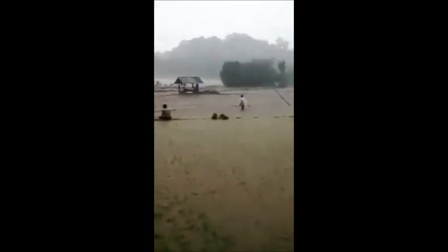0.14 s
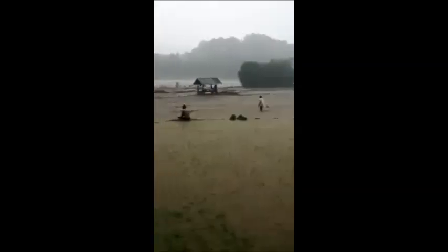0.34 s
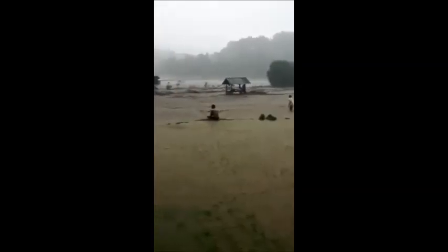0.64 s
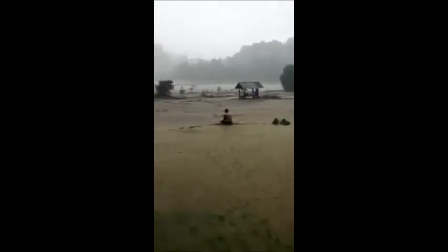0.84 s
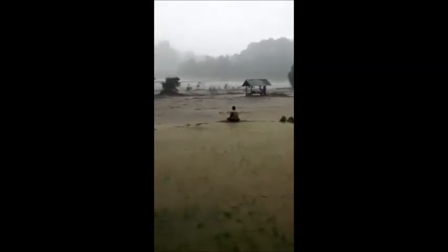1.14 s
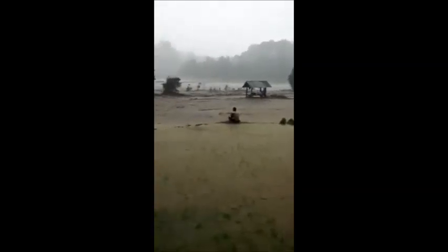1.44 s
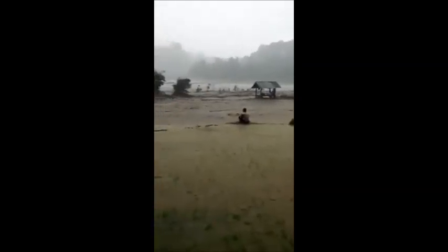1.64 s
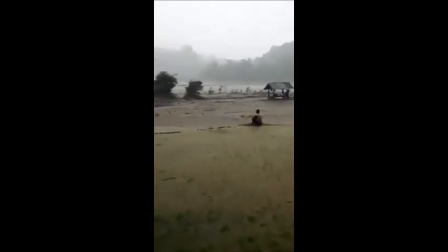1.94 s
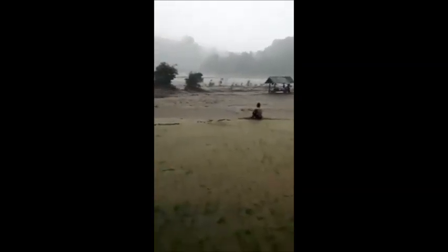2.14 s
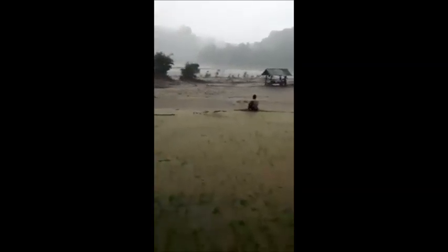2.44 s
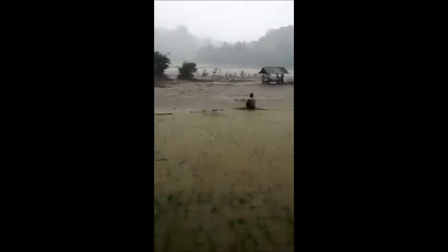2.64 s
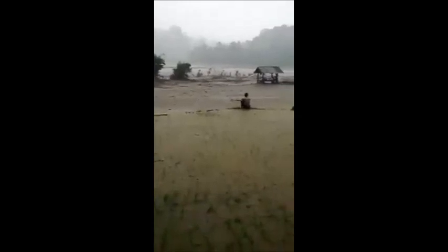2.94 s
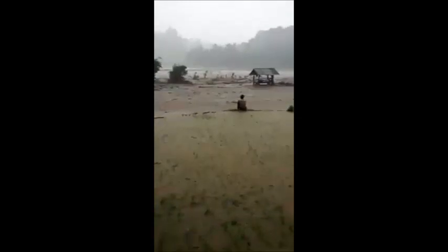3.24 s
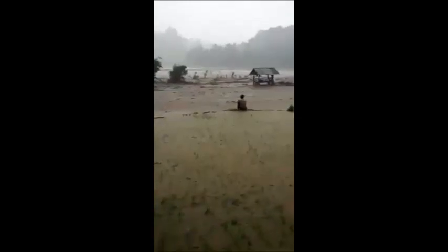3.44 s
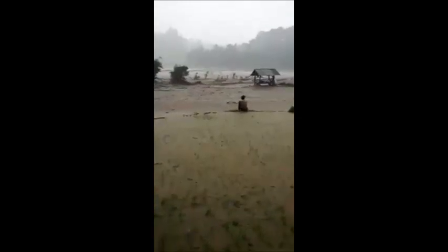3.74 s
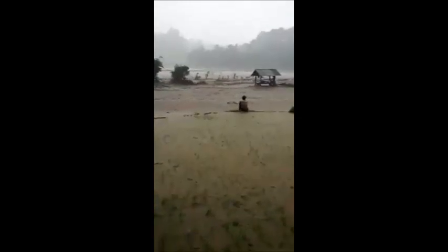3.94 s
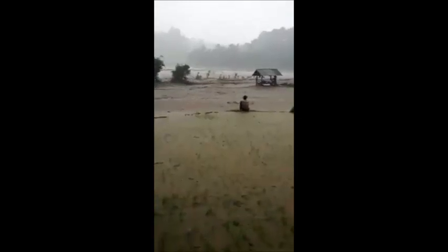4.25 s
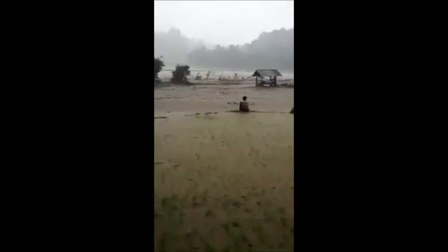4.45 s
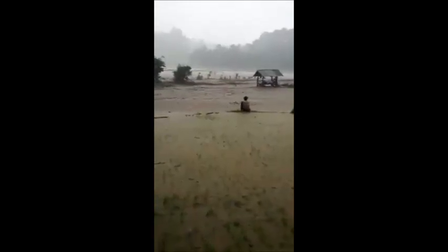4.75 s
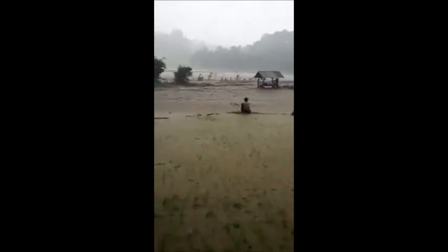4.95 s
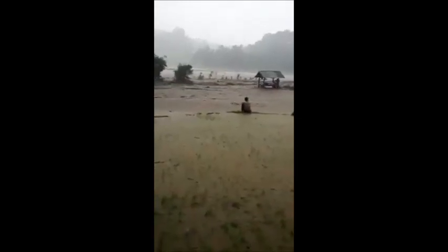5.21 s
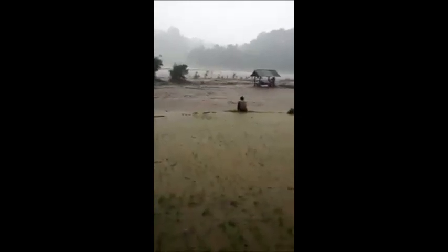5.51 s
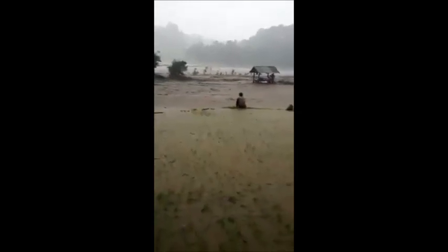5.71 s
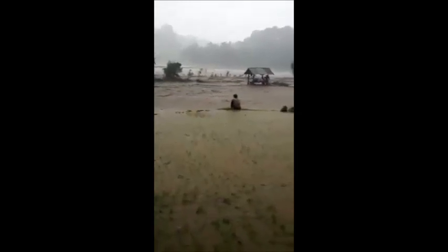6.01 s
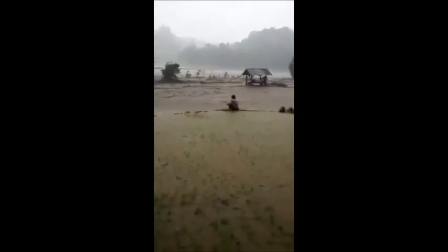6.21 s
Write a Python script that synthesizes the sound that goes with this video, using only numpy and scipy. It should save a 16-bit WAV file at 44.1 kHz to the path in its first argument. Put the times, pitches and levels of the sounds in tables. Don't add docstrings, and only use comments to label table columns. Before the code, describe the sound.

Dense, grainy downpour over wet grass and puddles, muddy flood water churning further off, sparse near splashes and a slightly watery phone-quality sound.

```python
import sys
import numpy as np
from scipy import signal
from scipy.fft import rfft, irfft, next_fast_len
from scipy.io import wavfile
from scipy.ndimage import uniform_filter1d

SR = 44100
rng = np.random.default_rng(int(sys.argv[2]) if len(sys.argv) > 2 else 0)


def generate_wav(signal):
    frames = np.transpose(np.atleast_2d(signal))
    scaled = np.clip(frames, -1, 1) * 32767
    pcm = np.round(scaled).astype(np.int16)
    wavfile.write(sys.argv[1], SR, pcm)


def voltage_ratio(decibels):
    exponent = np.asarray(decibels, float) / 20
    return 10 ** exponent


N = 281067

# [Hz, dB per Hz]
RAIN_HISS = [(2600, -41.5), (3600, -15.5), (4300, -8), (4700, -6.5), (5100, -0.5), (5600, -0.5),
             (5900, -0.5), (6400, -8), (6900, -24), (7600, -41)]
# [Hz, dB per Hz]
FINE_SPRAY = [(6000, -23.5), (6800, 2), (7300, 0), (7700, -9.5), (8000, -16), (8600, -21.5), (9500, -21)]
# [s, dB]
DOWNPOUR = [
    (0, .3),
    (1.2, -0.13),
    (3.3, -0.2),
    (4.3, 0.18),
    (6.37, 0.18),
]
# [s, dB, dB]
CLOSE_DROPS = [
    (.02, -38, -36),
    (1.406, -42, -40),
    (1.986, -38, -30),
    (2.167, -39, -32),
    (3.847, -43, -34),
    (4.256, -44, -38),
    (5.174, -53, -40),
    (5.821, -44, -35),
]
# [s, s, Hz, Hz, dB]
RISING_DRIP = (.82, .14, 1023, 1183, -36.5)
# [s, dB, Hz]
PHONE_BUMPS = [
    (0.279, -38.5, 167),
    (0.499, -52.5, 81),
]
# [Hz, dB per Hz]
FLOOD_ROAR = [(40, -59.5), (90, -22), (130, -19.5), (250, -11), (372, -9.5), (668, -1.5), (1100, -1),
              (1900, 1), (2420, -3), (3100, -3), (3700, -3.5), (4810, -33.5), (8000, -93)]
# [Hz, dB per Hz]
WIND_RUMBLE = [(10, -3), (25, -4.5), (45, -13), (80, -0.5), (110, -7), (200, -41)]
# [s, s]
RUMBLE_DIPS = [(.16, .09), (.66, .06), (1.3, .2), (1.98, .22), (2.7, .2), (3.08, .11), (3.5, .07),
               (3.97, .19), (4.48, .12), (4.93, .04), (6.08, .13)]
HIGH_COPIES = [(20, 36, 16, .35), (36, 47, 28, .6)]
LEVEL_EDGES = [20, 22, 24, 26, 28, 30, 32, 36, 40, 42, 47]

HISS_DB, SPRAY_DB, FLOOD_DB = -26, -43.5, -31.5
WIND_DB, DIP_DB = -69, -12
SLOT_HZ = 24000 / 128
LOWS_SR, HOP, FIRST_SAMPLE = 12000, 512, 444


def evened(x):
    return x / np.sqrt(np.mean(x ** 2) + 1e-20)


def read(points, hz):
    f, value = np.transpose(points)
    return np.interp(np.log(hz + 1), np.log(f + 1), value)


def coloured(x, spectrum):
    size = next_fast_len(len(x))
    gain = voltage_ratio(read(spectrum, np.fft.rfftfreq(size, 1 / SR)))
    return evened(irfft(rfft(x, size) * gain, size)[:len(x)])


def weather(level_db, follows):
    downpour_db = np.interp(np.arange(N) / SR, *np.transpose(DOWNPOUR))
    return voltage_ratio(level_db + follows * downpour_db)


def add(mix, start_s, sound):
    part = mix[round(start_s * SR):][:len(sound)]
    part += sound[:len(part)]


def patter(drops_per_s, spread_db, blur):
    size = voltage_ratio(spread_db * np.minimum(rng.exponential(1, N), 5)) * rng.choice([-1., 1.], N)
    drops = size * (rng.random(N) < drops_per_s / SR)
    blur = np.clip(blur, 0, 1)
    return np.sqrt(1 - blur) * evened(drops) + np.sqrt(blur) * rng.standard_normal(N)


def rain():
    clumps = uniform_filter1d(rng.standard_normal(N), size=1100)
    clumps = evened(uniform_filter1d(clumps, size=400))
    clumps = evened(clumps - uniform_filter1d(clumps, size=3500))
    hiss = coloured(patter(4000, 3.0, .5), RAIN_HISS)
    spray = coloured(patter(2000, 3.5, 0.46), FINE_SPRAY)
    hiss = weather(HISS_DB, 0.93) * voltage_ratio(1.6 * clumps) * hiss
    spray = weather(SPRAY_DB, .7) * voltage_ratio(1.0 * clumps) * spray
    return hiss + spray


def close_drops():
    out, t = np.zeros(N), np.arange(2048) / SR
    for start_s, splash_db, body_db in CLOSE_DROPS:
        burst = rng.standard_normal((2, len(t))) * np.exp(-t / .008)
        splash = voltage_ratio(splash_db) * coloured(burst[0], FINE_SPRAY)
        body = voltage_ratio(body_db) * coloured(burst[1], RAIN_HISS)
        add(out, start_s, (splash + body) * np.minimum(t / 0.0013, 1))
    return out


def rising_drip():
    out = np.zeros(N)
    start_s, length_s, first_hz, last_hz, top_db = RISING_DRIP
    progress = np.arange(0, length_s, 1 / SR) / length_s
    swell = voltage_ratio(top_db) * np.sin(np.pi * progress ** .9) ** 1.2
    pitch_hz = first_hz + (last_hz - first_hz) * progress
    add(out, start_s, swell * np.sin(2 * np.pi * np.cumsum(pitch_hz) / SR))
    return out


def handling():
    out, t = np.zeros(N), np.arange(6000) / SR
    for start_s, peak_db, pitch_hz in PHONE_BUMPS:
        envelope = np.exp(-t / 0.01) * np.minimum(t / .005, 1)
        add(out, start_s, voltage_ratio(peak_db) * np.sin(2 * np.pi * pitch_hz * t) * envelope)
    return out


def flood():
    frames = N // 256 + 5
    a, b, patches = rng.standard_normal((frames, 513, 3)).T
    patches = uniform_filter1d(patches, size=10, axis=0)
    patches = evened(uniform_filter1d(patches, size=10, axis=1))
    churn = signal.istft((a + 1j * b) * voltage_ratio(.8 * patches), nperseg=1024, noverlap=768)[1][:N]
    water = evened(churn) + 0.28 * patter(2500, 3.0, 0.12)
    return weather(FLOOD_DB, .8) * coloured(water, FLOOD_ROAR)


def wind():
    t = np.arange(N) / SR
    dip = sum(np.exp(-((t - middle_s) / half_s) ** 4) for middle_s, half_s in RUMBLE_DIPS)
    gain = voltage_ratio(WIND_DB + DIP_DB * np.minimum(dip, 1))
    return gain * coloured(rng.standard_normal(N), WIND_RUMBLE)


def scene():
    near = rain() + close_drops() + rising_drip() + handling()
    return (near + flood() + wind())[None]


def coarse_lows(x, step_share=1.1, wobble_db=2.0, least_db=-37):
    lead = 2 * HOP - FIRST_SAMPLE
    lows = signal.resample_poly(x, 40, 147)
    lows = np.r_[np.zeros(lead), lows, np.zeros(3 * HOP)]
    window = signal.windows.kaiser_bessel_derived(2 * HOP, 4 * np.pi)
    n, line = np.arange(2 * HOP)[:, None], np.arange(320)
    cosines = np.cos(np.pi / HOP * (n + .5 + HOP / 2) * (line + .5))
    basis = window[:, None] * cosines * np.sqrt(2 / HOP)
    lines = np.lib.stride_tricks.sliding_window_view(lows, 2 * HOP)[::HOP] @ basis

    usual = np.sqrt(uniform_filter1d((lines ** 2).mean(0), size=8))
    wobble = voltage_ratio(wobble_db * rng.standard_normal((len(lines), 40)).repeat(8, axis=1))
    step = np.maximum(step_share * usual, voltage_ratio(least_db) / 2) * wobble
    whole_steps = np.floor((abs(lines) / step) ** .75 + .4054)
    rounded = np.sign(lines) * whole_steps ** (4 / 3) * step
    lines = rounded + .03 * lines

    halves = (lines @ basis.T).reshape(len(lines), 2, HOP)
    joined = (halves[1:, 0] + halves[:-1, 1]).ravel()[lead - HOP:]
    return signal.resample_poly(joined, 147, 40)[:N]


def shifted(x, first, last, shift, noise):
    size = next_fast_len(N)
    z, per_slot = rfft(x, size), SLOT_HZ * size / SR
    lo, hi, by = round(first * per_slot), round(last * per_slot), round(shift * per_slot)
    source = z[lo - by:hi - by]
    source = source / np.sqrt(uniform_filter1d(abs(source) ** 2, size=4000))
    fill = (rng.standard_normal((hi - lo, 2)) @ [1, 1j]) / np.sqrt(2)
    out = np.zeros_like(z)
    out[lo:hi] = np.sqrt(1 - noise) * source + np.sqrt(noise) * fill
    return irfft(out, size)[:N]


def rebuilt_highs(x, lows, step_db=1.5):
    frames = dict(nperseg=320, noverlap=240, nfft=512)
    hz, t, z = signal.stft(x, SR, **frames)
    hits = np.transpose(CLOSE_DROPS)[0]
    regular = np.arange(.022, t[-1], HOP / LOWS_SR)
    borders = np.sort(np.r_[regular, hits, hits + .008, hits + .018])
    block = np.searchsorted(borders, t)
    inside = (block[:, None] == np.unique(block)).astype(float)

    def block_power(bins):
        return (abs(bins) ** 2).sum(0) @ inside / inside.sum(0) + 1e-20

    slot, out = hz / SLOT_HZ, 0
    top_fade = voltage_ratio(-80 * np.clip(slot - 45.8, 0, 2) ** 2 / 2)[:, None]
    for first, last, shift, noise in HIGH_COPIES:
        copy = signal.stft(shifted(lows, first, last, shift, noise), SR, **frames)[2]
        gain = np.zeros(z.shape)
        for lo, hi in zip(LEVEL_EDGES, LEVEL_EDGES[1:]):
            band = (slot >= lo) & (slot < hi) & (lo >= first) & (hi <= last)
            wanted_db = 10 * np.log10(block_power(z[band]))
            wanted = voltage_ratio(step_db * np.round(wanted_db / step_db))
            gain[band] = inside @ (wanted / np.sqrt(block_power(copy[band])))
        gain[slot < first] = gain[slot >= first][0]
        gain[slot >= last] = gain[slot < last][-1]
        out = out + gain * copy * top_fade
    return signal.istft(out, SR, **frames)[1][:N]


def top_cut(x):
    return signal.sosfilt(signal.butter(12, 8780, fs=SR, output="sos"), x)


def record(dry):
    lows = coarse_lows(dry[0])
    mix = (lows + rebuilt_highs(dry[0], lows))[None]
    return top_cut(mix)


dry = scene()
out = record(dry)
generate_wav(out)
```